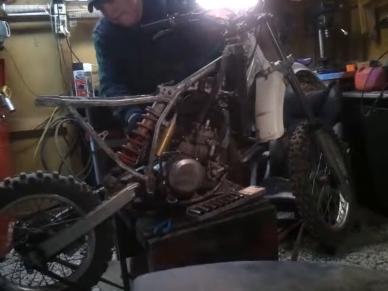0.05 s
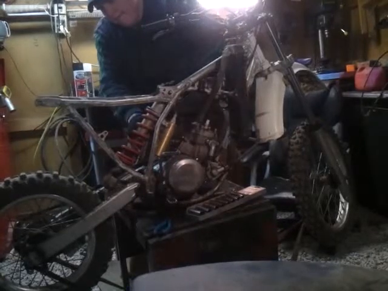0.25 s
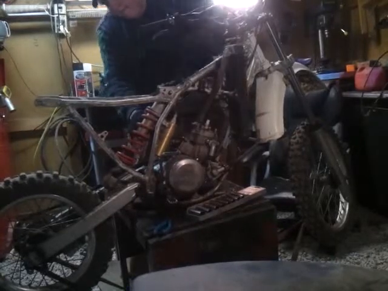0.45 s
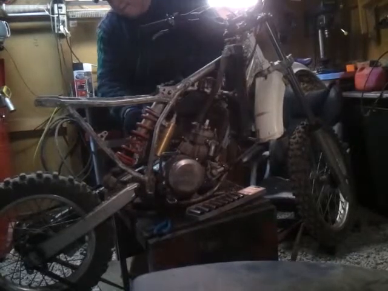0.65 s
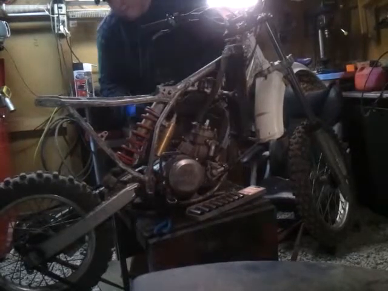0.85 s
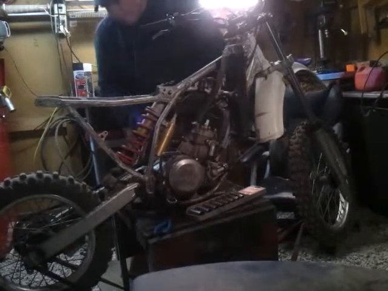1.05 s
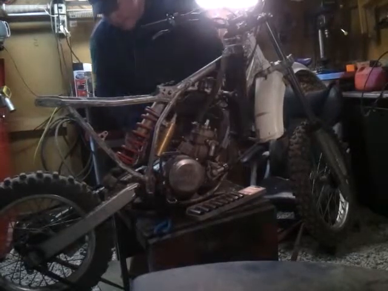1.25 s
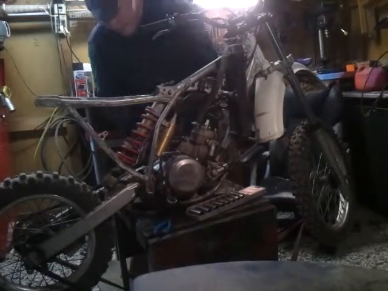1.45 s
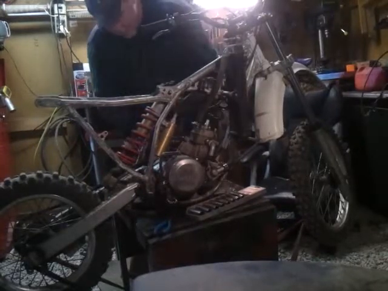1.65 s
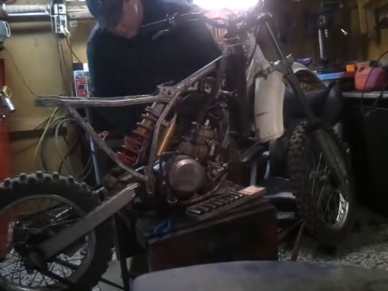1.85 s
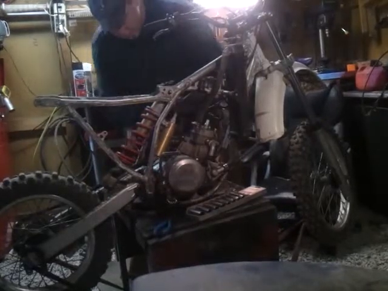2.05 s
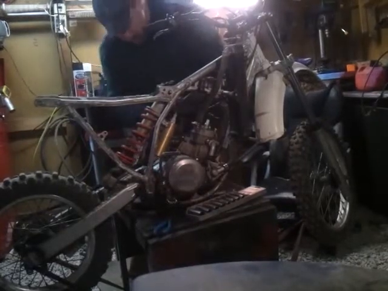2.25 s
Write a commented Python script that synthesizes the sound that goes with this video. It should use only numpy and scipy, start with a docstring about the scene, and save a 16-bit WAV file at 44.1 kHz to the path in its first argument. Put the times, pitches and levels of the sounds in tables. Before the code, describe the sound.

One sharp, loud metal clank with short room echo, followed by quiet bumps and brushing, then small bright clinks and a brief spanner ring; steady low motor hum, microphone a few metres away, slightly dull treble.

```python
"""Small garage, a few metres from someone working on a dirt bike. A steel tool slips and clanks hard on the frame.
Light ticks, dull knocks and a thin ring follow as parts are handled; hands and sleeves rub faintly.
A motor hums low behind it all. Impacts are noise bursts, coloured and echoed by the room;
rings are decaying sines, rubbing and air are filtered noise, the hum is a set of wavering sines."""
import sys
import numpy as np
from scipy import signal
from scipy.fft import rfft, irfft, next_fast_len
from scipy.io import wavfile
from scipy.ndimage import uniform_filter1d

SR = 44100
rng = np.random.default_rng(int(sys.argv[2]) if len(sys.argv) > 2 else 0)


def pcm_store(signal):
    """Save signal as 16-bit PCM."""
    levels = np.round(np.clip(np.atleast_2d(signal), -1, 1) * 32767)
    wavfile.write(sys.argv[1], SR, levels.astype(np.int16).T)


N = 101429  # samples

# Tool on the frame. Each row: start in seconds, level in dB.
CLANKS = [(0.2246, -19.5), (0.2611, 0.5)]
# Modes of tool and frame. Each row: frequency in Hz, relative level in dB, t60 in seconds.
FRAME_MODES = [(1349, -7, .15), (1474, 1, .19), (1515, -2, .19), (1592, -4, .17), (2063, 1, .17),
               (2124, 2, .17), (2200, -6, .14), (2920, -6, .18), (4483, -2, .17), (5210, -4, .2),
               (5668, -7, .2), (6020, -3, .15), (6158, 1, .16), (6693, 2, .16)]
# Thump of the whole bike. Each row: frequency in Hz, level in dB relative to the clank, t60 in seconds.
THUMP_MODES = [(121, -43, 0.21), (184, -50.5, 0.34), (239.6, -49, 0.31), (322, -50, 0.32),
               (904, -36, 0.074)]
# Colour of the crack. Each row: frequency in Hz, gain in dB.
CRACK_COLOUR = [(100, -6), (210, -3.5), (400, -9), (900, -2.5), (1200, -7), (1500, 8), (1800, -10),
                (2080, 3), (2500, -7.5), (3200, -5), (4500, -0.5), (5600, -2), (6400, 0.5), (7500, -7.5)]
FRAME_DB, CRACK_DB, CRACK_T60_S, CLANK_ROOM_DB = -11.5, 13, .015, -0.5

# Steel-on-steel ticks. Each row: start in seconds, level in dB, resonance of the part in Hz,
# resonance gain in dB, t60 of the contact envelope in seconds.
TICKS = [(.016, -27, 6340, -12.5, 0.11), (0.2163, -7.5, 6500, -2, .04), (0.2272, -7, 5260, 5.5, 0.021),
         (.246, -21.5, 5500, 4.5, .05), (0.414, -5, 6000, -12, .035), (1.5413, -22, 6400, 12, 0.052),
         (1.619, -18, 6900, 0.5, 0.2), (1.669, -24, 5500, -10, .04), (1.713, -17, 6500, -6, 0.12),
         (1.7235, -13.5, 6200, 4.5, 0.11), (1.764, -22, 6100, -7, 0.041),
         (1.9711, -20.5, 4150, 10.5, 0.042), (1.995, -31, 4170, 13, .05)]
# Modes of the small steel parts. Each row: frequency in Hz, relative level in dB, t60 in seconds.
TICK_MODES = [(3850, -11, .08), (4200, -10, .1), (4850, -6, .13), (5400, -4, .12), (5900, 0, .1),
              (6480, -3, .1), (6900, -4, .08)]
# Colour of a tick, also of sliding. Each row: frequency in Hz, gain in dB.
TICK_COLOUR = [(300, -18), (1200, -17), (2800, -11), (3900, -5.5), (4500, -7), (5300, -1), (6300, -1),
               (7400, -8)]
TICK_WIDTH_HZ, TICK_ROOM_DB, TICK_MODES_DB = 320, -0.5, -34.5

# Dull knocks of handled parts. Each row: start in seconds, level in dB, body resonance in Hz,
# resonance gain in dB, t60 of the contact envelope in seconds.
KNOCKS = [(.2235, -6.5, 540, -5, 0.074), (.25, -12.5, 450, 2, 0.06), (.562, -16.5, 450, 5.5, 0.063),
          (0.579, -23.5, 730, 7, 0.039), (0.8473, -13, 430, -1, 0.096), (1.087, -20.5, 440, 4, .025),
          (1.62, -18, 597, 7.5, 0.03), (1.631, -17, 766, 12, 0.057), (1.648, -23, 660, 10, 0.019),
          (1.714, -18.5, 478, 10, .04), (1.726, -18, 347, 13, .05), (1.772, -25.5, 600, 1, 0.05)]
# Colour of a knock. Each row: frequency in Hz, gain in dB.
KNOCK_COLOUR = [(80, -11.5), (210, 4), (330, 1), (450, 7.5), (900, 0.5), (1400, -6), (2300, -0.5),
                (3200, -14.5), (7000, -25.5)]
KNOCK_WIDTH_HZ, KNOCK_ROOM_DB = 290, -0.5

# Modes of the ringing spanner. Each row: frequency in Hz, level in dB, t60 in seconds.
SPANNER_MODES = [(2050, -62, 0.32), (3200, -62, 0.56), (4430, -51, 0.89), (5480, -58.5, 0.79)]
RING_START_S, RING_STOP_S, RING_DAMPED_T60_S, RING_WAVER_DB = 1.628, 1.756, .35, .8

# Hand and tool sliding over metal. Each row: middle in seconds, half length (to 1/e) in seconds, level in dB.
SLIDES = [(.56, 0.066, -60.5), (.93, 0.091, -68.5), (1.01, .05, -68.5), (1.312, 0.061, -60),
          (2.132, 0.15, -65.5)]
# Sleeves and hands brushing the bike. Each row: middle in seconds, half length (to 1/e) in seconds, level in dB.
RUSTLES = [(.45, 0.14, -54.5), (.61, 0.035, -59), (1.55, 0.026, -55.5)]
# Colour of the brushing. Each row: frequency in Hz, gain in dB.
RUSTLE_COLOUR = [(100, -3), (200, -10), (450, 6), (1000, 0), (2000, -10.5), (3200, -20.5), (6000, -14),
                 (7500, -20)]
RUB_UNEVEN_DB = 3.1

# Motor and mains hum. Each row: frequency in Hz, rms level in dB, both before the waver.
HUM_LINES = [(54.7, -57), (64.5, -56), (85.3, -56), (96.6, -51.5), (108.7, -59), (128.8, -59), (161, -68),
             (184, -67), (225, -63)]
HUM_WAVER_DB, HUM_DRIFT_HZ = 1.5, .5
# Air of the garage. Each row: frequency in Hz, relative density in dB per Hz.
AIR_COLOUR = [(20, -8), (38, -4.5), (52, 11), (75, 1.5), (122, 6), (145, -9), (200, -5), (235, -2.5),
              (280, -4.5), (450, -11.5), (1000, -12.5), (1600, -20), (3000, -25.5), (4500, -27.5),
              (6200, -25.5), (7500, -34.5)]
AIR_DB, AIR_SWELL_DB = -49, .3

ROOM_T60_S, ROOM_TREBLE_T60_S, ROOM_BUILD_S, ROOM_SPLIT_HZ = .42, .26, .002, 900
TREBLE_EDGE_HZ, TOP_HZ = 7330, 8215


def undb(db):
    """Decibels to amplitude gain."""
    return 10 ** (np.asarray(db) / 20)


def unit(x):
    """Scale to rms 1."""
    return x / np.sqrt(np.mean(x ** 2))


def fade(start_s, t60_s):
    """Silence until start, then exponential decay, 60 dB per t60."""
    age_s = np.arange(N) / SR - start_s
    return (age_s >= 0) * np.exp(-np.log(1000) * np.maximum(age_s, 0) / max(t60_s, 1e-3))


def colour(x, points):
    """Causal minimum-phase filter through (Hz, dB) points, interpolated over log frequency."""
    size = 2 * next_fast_len(N)
    hz, db = np.array(points).T
    grid_hz = np.maximum(np.arange(size // 2 + 1) * SR / size, 1)
    gain = undb(np.interp(np.log(grid_hz), np.log(hz), db))
    cepstrum = irfft(np.log(gain))
    # fold to minimum phase
    cepstrum[1:size // 2] *= 2
    cepstrum[size // 2 + 1:] = 0
    return irfft(rfft(x, size) * np.exp(rfft(cepstrum)))[:N]


def walk(rate_hz):
    """Slow random curve, rms 1: held random steps, smoothed twice."""
    hold = int(SR / rate_hz)
    steps = np.repeat(rng.standard_normal(N // hold + 2), hold)
    smooth = uniform_filter1d(uniform_filter1d(steps, hold), hold)
    return unit(smooth[:N])


def contact(start_s, t60_s):
    """Dying chatter of tiny impacts: decaying noise with a flattened spectrum and unit energy."""
    shape = fade(start_s, t60_s)
    spectrum = rfft(shape * rng.standard_normal(N))
    flatter = spectrum / np.sqrt(np.abs(spectrum) + 1e-9)
    burst = irfft(flatter, N) * (shape > 0)
    return burst / np.sqrt(np.sum(burst ** 2))


def ring(start_s, modes):
    """Decaying sines of random polarity, set off at one moment."""
    age_s = np.arange(N) / SR - start_s
    out = 0
    for hz, db, t60_s in modes:
        polarity = rng.choice([-1, 1])
        out = out + polarity * undb(db) * fade(start_s, t60_s) * np.sin(2 * np.pi * hz * age_s)
    return out


def resonate(x, hz, width_hz):
    """Two-pole band-pass, gain 1 at the centre."""
    return signal.lfilter(*signal.iirpeak(hz, hz / width_hz, fs=SR), x)


def garage(x, room_db):
    """Direct sound plus the dense, short echo of a cluttered room; the treble dies first."""
    t = np.arange(N) / SR
    noise = rng.standard_normal(N)
    low = signal.sosfiltfilt(signal.butter(2, ROOM_SPLIT_HZ, fs=SR, output="sos"), noise)
    tail = low * fade(0, ROOM_T60_S) + (noise - low) * fade(0, ROOM_TREBLE_T60_S)
    tail = tail * (1 - np.exp(-t / ROOM_BUILD_S))
    tail = tail / np.sqrt(np.sum(tail ** 2))
    return x + undb(room_db) * signal.fftconvolve(x, tail)[:N]


def clanks():
    """A hard crack; tool and frame ring briefly and the bike thumps."""
    crack, body = 0, 0
    for start_s, db in CLANKS:
        crack = crack + undb(db) * contact(start_s, CRACK_T60_S)
        frame = undb(FRAME_DB) * ring(start_s, FRAME_MODES) / len(FRAME_MODES)
        body = body + undb(db) * (frame + ring(start_s, THUMP_MODES))
    crack = undb(CRACK_DB) * colour(crack, CRACK_COLOUR)
    return garage(crack, CLANK_ROOM_DB) + body


def ticks():
    """Small bright touches of steel on steel; the parts ring, and each touch stresses one resonance."""
    touches, rings = 0, 0
    for start_s, db, hz, resonance_db, t60_s in TICKS:
        touch = undb(db) * contact(start_s, t60_s)
        touches = touches + touch + undb(resonance_db) * resonate(touch, hz, TICK_WIDTH_HZ)
        rings = rings + undb(db + TICK_MODES_DB) * ring(start_s, TICK_MODES)
    return garage(colour(touches, TICK_COLOUR), TICK_ROOM_DB) + rings


def knocks():
    """Soft bumps, each with the short low resonance of the part that is hit."""
    bumps = 0
    for start_s, db, hz, resonance_db, t60_s in KNOCKS:
        bump = undb(db) * contact(start_s, t60_s)
        bumps = bumps + bump + undb(resonance_db) * resonate(bump, hz, KNOCK_WIDTH_HZ)
    return garage(colour(bumps, KNOCK_COLOUR), KNOCK_ROOM_DB)


def spanner():
    """A thin ring that wavers as the tool moves, until the hand damps it."""
    free = np.arange(N) / SR < RING_STOP_S
    partials = 0
    for mode in SPANNER_MODES:
        partials = partials + ring(RING_START_S, [mode]) * undb(RING_WAVER_DB * walk(70))
    return partials * np.maximum(free, fade(RING_STOP_S, RING_DAMPED_T60_S))


def rubbing(strokes, points):
    """Faint, uneven friction: coloured noise under bell-shaped strokes."""
    t = np.arange(N) / SR
    pressure = 0
    for middle_s, half_s, db in strokes:
        pressure = pressure + undb(db) * np.exp(-((t - middle_s) / half_s) ** 2)
    noise = unit(colour(rng.standard_normal(N), points))
    return pressure * undb(RUB_UNEVEN_DB * walk(60)) * noise


def hum():
    """Low motor and mains lines, each wavering a little in pitch and level."""
    lines = 0
    for hz, db in HUM_LINES:
        turns = np.cumsum(hz + HUM_DRIFT_HZ * walk(3.89)) / SR + rng.random()
        level = np.sqrt(2) * undb(db + HUM_WAVER_DB * walk(6.32))  # rms to peak
        lines = lines + level * np.sin(2 * np.pi * turns)
    return lines


def air():
    """Air of the room: coloured noise that swells slightly."""
    noise = unit(colour(rng.standard_normal(N), AIR_COLOUR))
    return undb(AIR_DB + AIR_SWELL_DB * walk(2.2)) * noise


def scene():
    """All the work sounds over hum and air, in mono."""
    work = clanks() + ticks() + knocks() + spanner()
    rubs = rubbing(SLIDES, TICK_COLOUR) + rubbing(RUSTLES, RUSTLE_COLOUR)
    return (work + rubs + hum() + air())[None]


def record(dry):
    """Steep low-pass: the treble falls away quickly and ends near 8 kHz."""
    dull = signal.sosfilt(signal.butter(30, TREBLE_EDGE_HZ, fs=SR, output="sos"), dry)
    return signal.sosfilt(signal.ellip(8, .2, 60, TOP_HZ, fs=SR, output="sos"), dull)


dry = scene()
out = record(dry)
pcm_store(out)
```